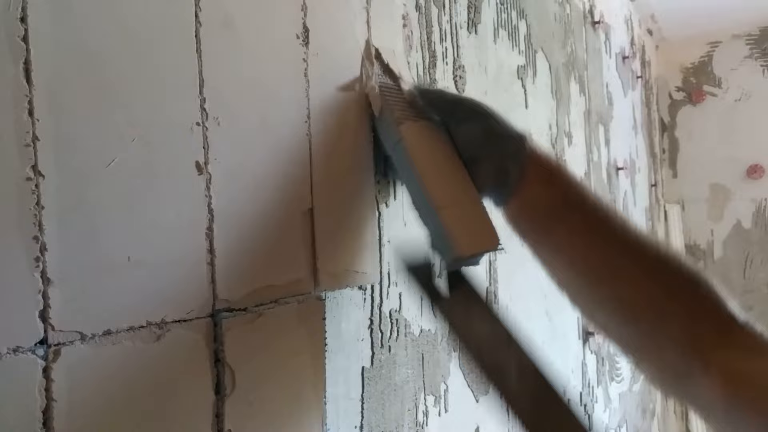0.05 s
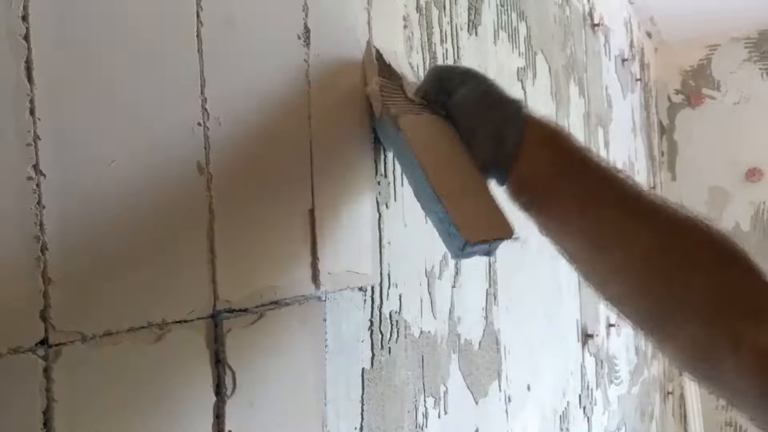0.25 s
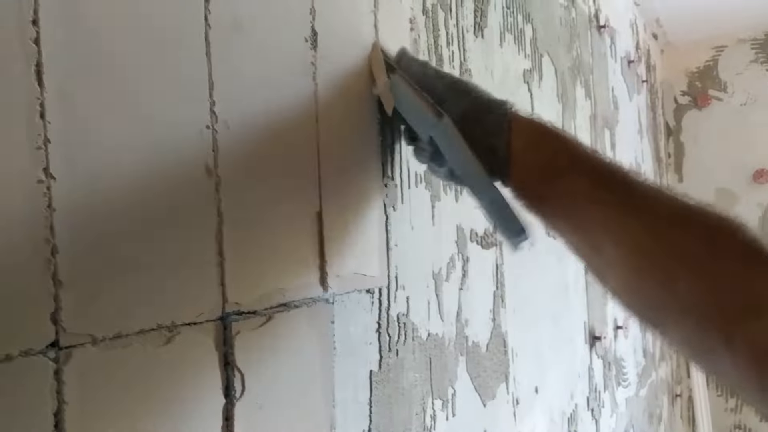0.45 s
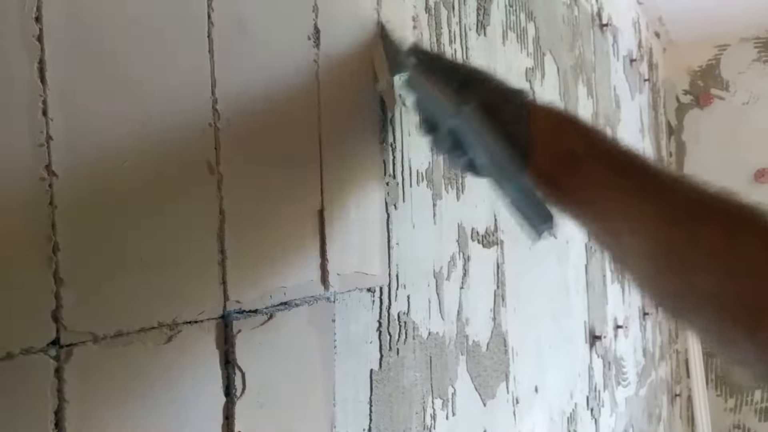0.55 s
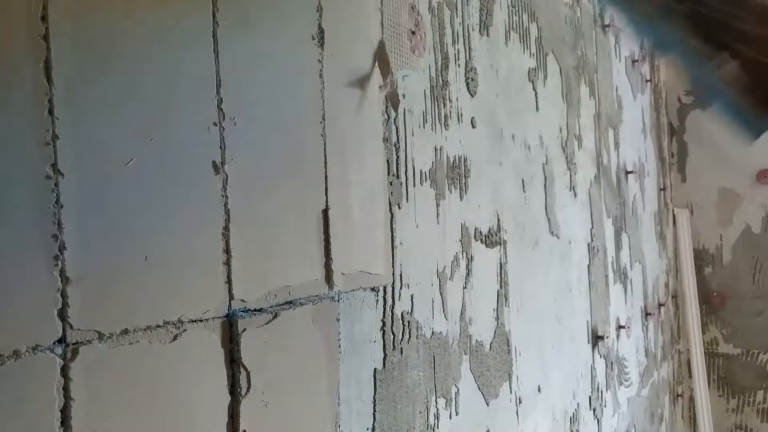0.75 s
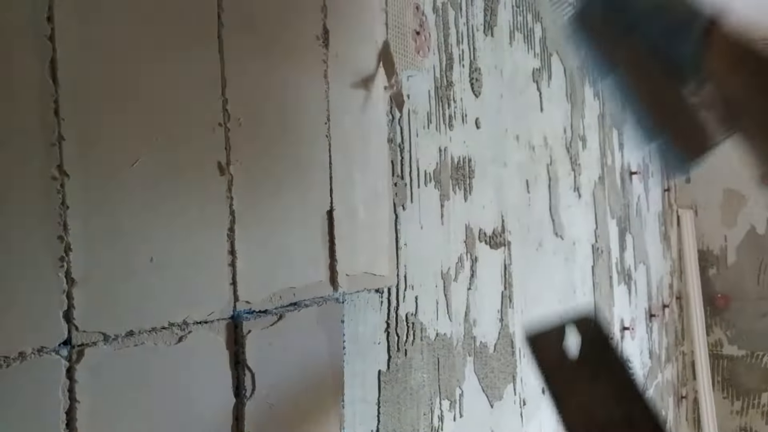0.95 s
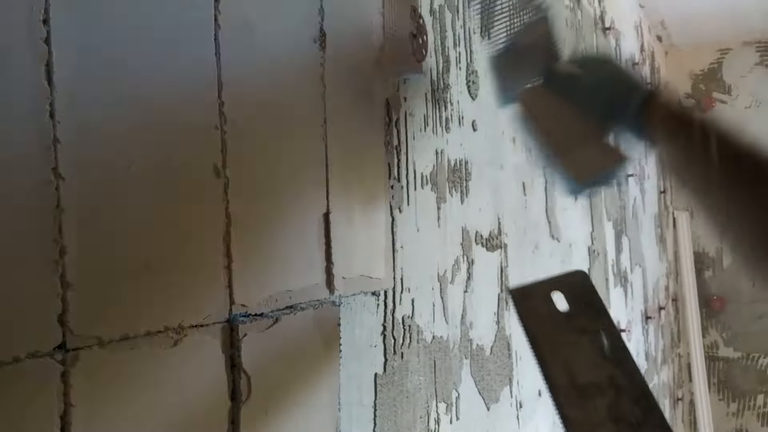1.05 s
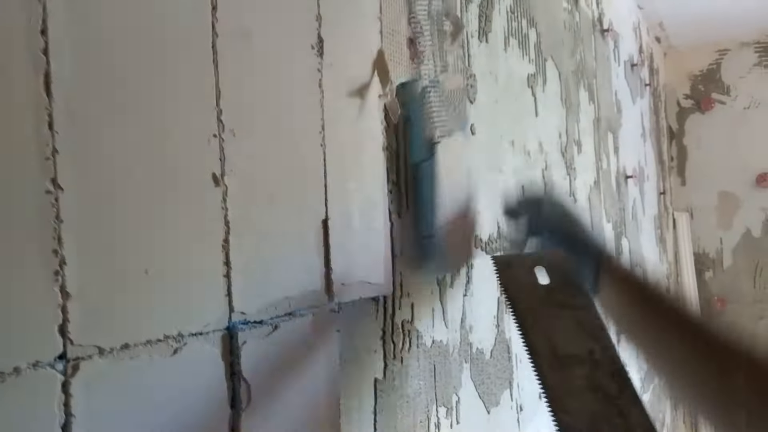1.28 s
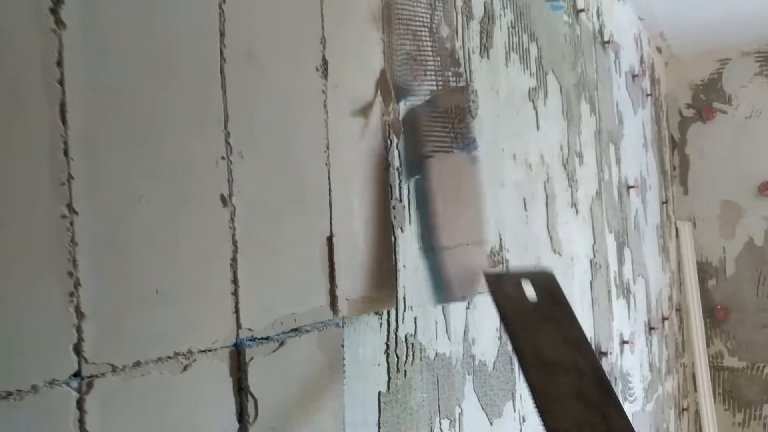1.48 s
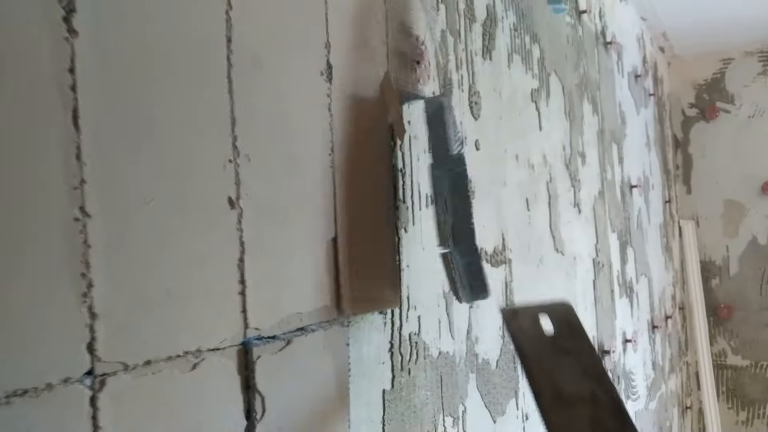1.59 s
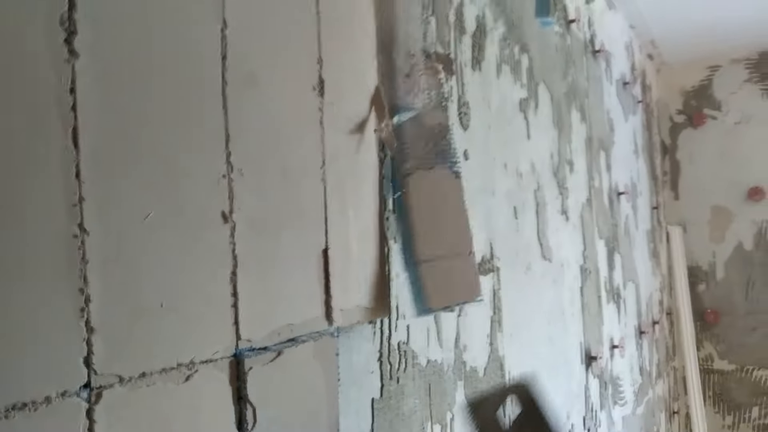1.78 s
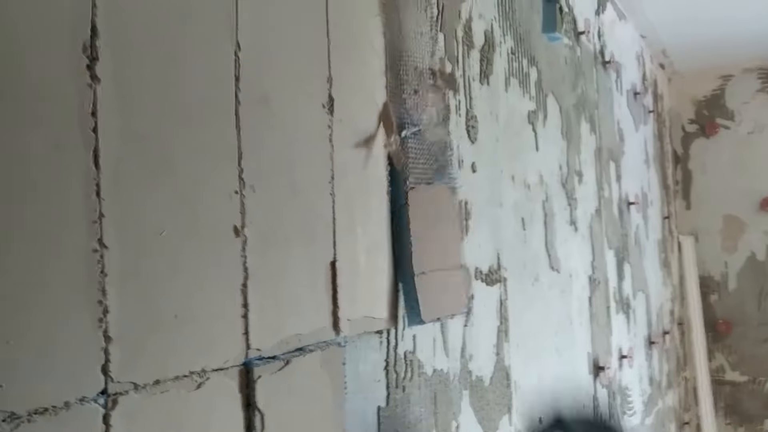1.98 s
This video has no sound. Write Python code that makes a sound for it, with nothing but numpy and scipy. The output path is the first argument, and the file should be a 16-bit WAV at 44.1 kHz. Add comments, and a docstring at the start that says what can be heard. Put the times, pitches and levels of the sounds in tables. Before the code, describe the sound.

Harsh tearing of a stiff foam panel from plaster, with brittle snaps, scraping and loose knocks

```python
"""A glued foam insulation board is torn off the wall of a bare room: bursts of tiny random clicks make the rip,
heard as bright crackle and as a duller rasp through the board, in two pulls. Glue snaps and board cracks are
short clicks and crumbs sent into resonances. Foam and mesh scrape the plaster as clicks in slipping surges; the
loose board knocks, ringing its own tones, and judders once. Steel tinks twice as fading pure tones. Noise makes
the hard echoes and a faint hush. The loudest moments are cut flat at a fixed limit."""
import sys
import numpy as np
from scipy import signal
from scipy.fft import rfft, irfft
from scipy.io import wavfile

SR = 44100
rng = np.random.default_rng(int(sys.argv[2]) if len(sys.argv) > 2 else 0)


def wav_out(sig):
    """Save sig, one row per channel (or a flat mono array), as 16-bit PCM at SR to the path in sys.argv[1]."""
    wavfile.write(sys.argv[1], SR, np.round(np.clip(np.atleast_2d(sig).T, -1, 1) * 32767).astype(np.int16))


N = 89567
T = np.arange(N) / SR  # time in seconds
SIZE = 2 ** 18  # Fourier length, with space for the echoes
HZ = np.maximum(np.arange(SIZE // 2 + 1) * SR / SIZE, 1)

# All levels below are relative, ahead of the layer gains, the room and the microphones.
# Background hush colour. Each row: frequency in Hz, level in dB.
HUSH_COLOUR = [(30, 4), (70, 15), (115, 33), (170, 7), (500, 31.5), (2000, 22.5), (15000, -90)]
HUSH_DB = -55
# How the microphones colour the sound. Each row: frequency in Hz, level in dB.
MICROPHONE = [(100, 3), (6900, -1.5), (7700, -2), (8200, -15.5), (9000, -7.5), (15000, -12.5)]
CLIP_LEVEL = 0.93  # largest signal size; full scale is 1
CUTOFF_HZ = 15600

# The bare room: time for echoes to fall 60 dB, first echo, and how fast the near wall's part fades.
ROOM_T60_S, ROOM_TREBLE_T60_S = 0.28, 0.21
FIRST_ECHO_S, NEAR_WALL_S = 0.0009, 0.0047
# Room sound at each pitch, added to a source's own room level. Each row: frequency in Hz, level in dB.
SCATTER = [(100, 4.5), (300, 3), (800, 4), (2000, 4.5), (3400, -4.5), (4300, 13.5), (12000, 10.5)]
# Left minus right for tearing, for rubbing and knocking, and for snaps and tinks.
# Each row: frequency in Hz, difference in dB.
TEAR_BALANCE = [(100, 3), (500, 3.5), (1200, 5), (2400, -0.5), (3500, 0.5), (4800, -5), (7000, -2),
                (9000, 3.5)]
RUB_BALANCE = [(100, -1), (500, -2), (1100, -2), (2400, -2), (3300, -3.5), (4300, -11), (7000, -10.5),
               (9000, 0.5)]
SNAP_BALANCE = [(2400, 2), (4300, -4), (6000, -1.5), (7200, -4), (9000, 5.5)]

# Touches on the steel. Each row: start in seconds, level in dB.
TINKS = [(1.033, -42), (1.2411, -15.5)]
# Tones of the steel. Each row: frequency in Hz, level in dB, time to fall 60 dB in seconds.
STEEL = [(5531, -5, .35), (5839, -8, .28), (6107, 0, .22), (7542, -4, .18)]

# Strokes of foam and mesh on the wall. Each row: time in seconds, crackle level in dB, body level in dB.
RUBS = [
    [(0.0, -66, -32), (0.04, -31, -49.5), (0.075, -26, -39.5), (0.136, -22, -48), (0.165, -42, -62),
     (0.2, -29.5, -38), (0.27, -37.5, -63)],
    [(1.0, -31.5, -41), (1.082, -29, -40.5), (1.216, -20.5, -32.5), (1.43, -37, -49.5)],
    [(1.44, -18.5, -38.5), (1.506, -24.5, -28.5), (1.555, -27.5, -42), (1.628, -20.5, -32.5),
     (1.714, -18.5, -29), (1.9, -22, -36), (1.975, -20.5, -30), (2.03, -17, -28)],
]
# Colours of the rubbing, direct and through the board. Each row: frequency in Hz, level in dB.
RUB_CRACKLE = [(2500, -15.5), (3500, -11.5), (4300, 4.5), (5500, 9.5), (7200, 6), (8000, 9), (10000, -1.5),
               (15000, -1)]
RUB_BODY = [(40, -57), (80, -8), (125, -10.5), (200, -1), (350, -5.5), (520, -4.5), (750, 8), (1100, -1),
            (1550, 9), (1900, 2.5), (2500, 4.5), (3300, 5), (5000, -27)]

# Blows of the loose board on the wall. Each row: start in seconds, level in dB, pitch in Hz, width in Hz,
# crumble fade time in seconds, broadband crack in dB against the ring.
KNOCKS = [(1.138, -41, 224, 220, 0.028, -5), (1.144, -34, 860, 900, 0.003, 12),
          (1.440, -36, 775, 800, 0.0022, -4), (1.444, -24.5, 1720, 1700, 0.0036, 9.5),
          (1.489, -42, 159, 80, 0.00085, -34), (1.489, -23.5, 2260, 2200, 0.013, -18),
          (1.568, -25.5, 685, 1210, 0.00072, 2), (1.5895, -19.5, 1020, 1380, 0.0017, -7.5),
          (1.682, -25, 1270, 910, 0.0037, -25), (1.712, -25.5, 1250, 1200, 0.0099, -15),
          (1.724, -26.5, 2050, 1100, 0.0058, -27), (1.915, -28, 980, 1290, 0.0064, 9),
          (1.950, -24.5, 1420, 1230, 0.0089, 0), (1.966, -18.5, 1240, 1910, 0.0029, 2)]
# Natural tones of the hanging board. Each row: frequency in Hz, level in dB.
BOARD_TONES = [(510, 7.5), (720, -4), (960, -5), (1340, 1.5), (1600, 2.5), (2020, -4)]
BOARD_WIDTH_HZ, CONTACT_DB = 88, -4
# One judder of the board's edge. It starts sharp by the sag, as a share of the settled pitch.
JUDDER_S, JUDDER_DB, JUDDER_HZ = 1.6925, 7, 928
JUDDER_SAG, JUDDER_DECAY_S = 0.11, 0.0035

# Brittle snaps of glue and mesh. Each row: start in seconds, level in dB, pitch in Hz, width in Hz,
# crumble fade time in seconds, broadband crack in dB against the ring.
SNAPS = [(0.001, -28, 6300, 2070, 0.0017, -6.5), (0.0745, -19, 7630, 1040, 0.0068, -25),
         (0.089, -24, 6150, 2100, 0.0071, -44), (0.101, -26, 5900, 1000, 0.001, -27),
         (0.126, -24, 7550, 2480, 0.0036, -7), (0.1498, -15.5, 6050, 1200, 0.00053, -40),
         (0.3615, -14, 6220, 2180, 0.031, 1), (0.483, -20.5, 4380, 900, 0.018, -25),
         (0.620, -28.5, 4750, 1800, 0.0045, -29), (0.652, -20, 4600, 2500, 0.0038, -15),
         (0.802, -18, 6800, 900, 0.0057, -15), (0.855, -20, 5700, 2500, 0.018, -16),
         (1.035, -30, 5340, 2000, 0.0051, -1), (1.116, -23, 5780, 2270, 0.035, -9),
         (1.200, -25, 7450, 1470, 0.0031, -28), (1.2405, -20.5, 6440, 1580, 0.0063, 0),
         (1.445, -20, 6060, 2260, 0.0017, -20), (1.489, -24.5, 4200, 2300, 0.0023, -24),
         (1.635, -28, 5550, 2000, 0.0036, -7), (1.829, -18.5, 6330, 1300, 0.011, -23),
         (1.907, -18, 7250, 600, 0.015, -29), (1.967, -26.5, 4500, 3000, 0.0091, -16),
         (1.994, -25.5, 6300, 2200, 0.0035, -4), (2.006, -20.5, 5550, 2500, 0.01, -22)]
# Cracks of the bending board. Each row: start in seconds, level in dB, pitch in Hz, width in Hz,
# crumble fade time in seconds, broadband crack in dB against the ring.
CRACKS = [(0.125, -38, 2130, 700, 0.003, -8), (0.28, -39.5, 2050, 1010, 0.0083, -20),
          (0.363, -22, 1220, 905, 0.012, -38), (0.442, -16.5, 2520, 500, 0.025, 5.5),
          (0.485, -22, 950, 920, 0.0075, 1), (0.652, -17.5, 1500, 300, 0.039, -5),
          (0.72, -24.5, 610, 300, 0.028, -31)]
CRUMBLE_DB, CRUMBLE_RISE_S = 9, 0.0011
CRACK_LOW_CUT_SHARE = 0.71  # low cut as a share of the blow's pitch

# The two pulls. Each row: time in seconds, crackle level in dB, body level in dB.
PULLS = [
    [(0.27, -62, -48), (0.28, -30.5, -34.5), (0.31, -27.5, -29), (0.35, -34, -40), (0.366, -27, -12.5),
     (0.422, -23, -26.5), (0.44, -13, -16), (0.482, -12.5, -20.5), (0.57, -96, -49), (0.58, -18, -29),
     (0.6, -65, -25)],
    [(0.6, -49, -54), (0.61, -30, -62), (0.62, -16.5, -22), (0.642, -26, -35.5), (0.658, -8.5, -12.5),
     (0.8, -6, -14.5), (0.848, -22, -20), (0.854, -16, -17), (0.954, -30, -36.5), (0.98, -64, -75),
     (1.0, -45, -50)],
]
# Colours of the tearing, direct and through the board. Each row: frequency in Hz, level in dB.
TEAR_CRACKLE = [(2800, -22.5), (3600, -3.5), (4300, 1.5), (5200, 4), (6900, 2), (7700, -2), (10000, -10),
                (15000, -10)]
TEAR_BODY = [(40, -32.5), (150, -13.5), (380, -10.5), (650, -6), (1000, -0.5), (1300, -9), (1600, 11.5),
             (1900, -7.5), (2500, 3), (3200, -4), (4500, -27)]
# Moving resonance of the bent board. Each row: time in seconds, frequency in Hz.
FLEX = [(0.37, 1540), (0.5, 1020), (0.66, 1400), (0.72, 1000), (0.76, 1630), (0.81, 1940), (0.95, 2360)]
FLEX_DB, FLEX_WIDTH_HZ = -7, 700  # the width of each of two passes


def from_db(db):
    """Turn decibels into a gain."""
    return 10 ** (np.asarray(db) / 20)


def rms_one(x):
    """Scale a sound to an average power of one."""
    return x / np.sqrt(np.mean(x ** 2) + 1e-20)


def at_hz(points):
    """Read a table at every frequency, in straight lines along log frequency."""
    hz, value = np.transpose(points)
    return np.interp(np.log(HZ), np.log(hz), value)


def colour(x, points):
    """Filter to a dB curve without any sound arriving early (minimum phase)."""
    cepstrum = irfft(np.log(from_db(at_hz(points))))
    # Folding the second half onto the first moves the whole response after time zero.
    cepstrum[1:SIZE // 2] *= 2
    cepstrum[SIZE // 2 + 1:] = 0
    response = np.exp(rfft(cepstrum))
    return irfft(rfft(x, SIZE) * response)[..., :N]


def high_pass(x, hz, order):
    """Remove the sound below a frequency."""
    return signal.sosfilt(signal.butter(order, hz, "high", fs=SR, output="sos"), x)


def resonator(hz, width):
    """Filter numbers for one resonance with a gain of about one at its peak; a wider one dies sooner."""
    r = np.exp(-np.pi * width / SR)
    top = np.array([1, 0, -1]) * (1 - r * r) / 2
    poles = [1, -2 * r * np.cos(2 * np.pi * hz / SR), r * r]
    return top, poles


def resonate(x, hz, width):
    """Ring one fixed resonance."""
    top, poles = resonator(hz, width)
    return signal.lfilter(top, poles, x + 1e-18)


def glide(x, hz, width):
    """Ring a resonance whose pitch moves, updated every 128 samples."""
    out, state = np.zeros(N), np.zeros(2)
    for i in range(0, N, 128):
        block = slice(i, i + 128)
        top, poles = resonator(hz[i], width)
        out[block], state = signal.lfilter(top, poles, x[block], zi=state)
    return out


def fractures(per_s, spread_db):
    """Foam cells or grit break as random clicks of uneven size and either sign."""
    size = from_db(spread_db * np.minimum(rng.exponential(1, N), 3.5))
    sign = rng.choice([-1, 1], N)
    breaks = rng.random(N) < per_s / SR
    return rms_one(size * sign * breaks)


def chips(per_s, spread_db, sharpness):
    """Larger flakes break at random, each ringing briefly at one of 24 pitches."""
    clicks = fractures(per_s, spread_db)
    dealt = rng.integers(0, 24, N)
    pitches = np.geomspace(450, 8000, 24)
    return rms_one(sum(resonate(clicks * (dealt == k), hz, hz / sharpness) for k, hz in enumerate(pitches)))


def slips(per_s, depth_db, relax_s):
    """Surfaces stick and slip: the gain surges suddenly at random, then dies back."""
    kicks = (rng.random(N) < per_s / SR) * rng.uniform(0.13, 1, N)
    keep = np.exp(-1 / (relax_s * SR))
    surge = signal.lfilter([1], [1, -keep], kicks + 1e-18)
    return rms_one(from_db(depth_db * np.tanh(surge)))


def stroke_gain(strokes, column):
    """Follow one level column over time; silent outside the strokes."""
    gain = np.zeros(N)
    for stroke in strokes:
        rows = np.array(stroke)
        active = (T >= rows[0, 0]) * (T < rows[-1, 0])
        gain += from_db(np.interp(T, rows[:, 0], rows[:, column])) * active
    return gain


def friction(strokes, crackle, body, grains, crackle_db, body_db):
    """The same breaking grains are heard directly as crackle and through the board as a rasp."""
    direct = from_db(crackle_db) * stroke_gain(strokes, 1) * rms_one(colour(grains, crackle))
    through_board = from_db(body_db) * stroke_gain(strokes, 2) * rms_one(colour(grains, body))
    return direct + through_board


def blows(rows, crumble_db=CRUMBLE_DB):
    """Each blow sends a click and a dying run of crumbs into a resonance, with a broader crack on top."""
    out = np.zeros(N + SR)
    t = T[:SR // 10]
    for s, db, hz, width, crumble_s, crack_db in rows:
        fade = np.exp(-t / crumble_s) * (1 - np.exp(-t / CRUMBLE_RISE_S))
        crumbs = rng.standard_normal(len(t)) * (rng.random(len(t)) < 3000 / SR) * fade
        force = from_db(crumble_db) * rms_one(crumbs) / np.sqrt(len(t))
        force[0] = 1  # the first click
        ring = resonate(resonate(force, hz, width), hz, hz / 2)
        crack = high_pass(resonate(force, hz, hz * 2), hz * CRACK_LOW_CUT_SHARE, 1)
        sound = rms_one(ring) + from_db(crack_db) * rms_one(crack)
        start = max(int(s * SR), 0)
        # The row's level sets the power over this tenth of a second.
        out[start:start + len(t)] += from_db(db) * rms_one(sound)
    return out[:N]


def bare_room(near_wall_db):
    """Hard walls give dense fading echoes; the rough near wall adds early treble, and treble dies first."""
    noise = rng.standard_normal((2, N))
    scattered = noise * (1 + from_db(near_wall_db) * np.exp(-T / NEAR_WALL_S))
    low = signal.sosfilt(signal.butter(2, 2500, fs=SR, output="sos"), noise)
    high = high_pass(scattered, 2500, 2)
    low_tail = low * from_db(-60 * T / ROOM_T60_S)
    high_tail = high * from_db(-60 * T / ROOM_TREBLE_T60_S)
    # Subtracting keeps the two bands in step where they meet.
    tail = (low_tail - high_tail) * (T > FIRST_ECHO_S)
    return rms_one(tail) / np.sqrt(N)


def place(x, room, balance, wet_db, lag_s):
    """Direct sound reaches the left microphone first, the right one a lag later; room echoes are added."""
    direct = np.array([np.ones(len(HZ)), np.exp(-2j * np.pi * HZ * lag_s)])
    wet = from_db(wet_db + at_hz(SCATTER))
    path = (direct + wet * rfft(room, SIZE)) / np.sqrt(1 + wet ** 2)
    sides = from_db(at_hz(balance) * np.array([[0.5], [-0.5]]))
    return irfft(rfft(x, SIZE) * path * sides)[:, :N]


def background_hush():
    """Faint coloured noise, separate in each channel."""
    return from_db(HUSH_DB) * rms_one(colour(rng.standard_normal((2, N)), HUSH_COLOUR))


def tinks():
    """Light touches set steel ringing in pure tones, each fading at its own rate."""
    out = np.zeros(N)
    for s, db in TINKS:
        age = np.maximum(T - s, 0)
        for hz, tone_db, t60 in STEEL:
            out += from_db(db + tone_db - 60 * age / t60) * np.sin(2 * np.pi * hz * age)
    return out


def rubbing():
    """Foam and mesh drag over gritty plaster, breaking grains in stick-slip surges."""
    grit = fractures(per_s=3000, spread_db=-2) * slips(per_s=23, depth_db=18.0, relax_s=0.0044)
    grains = rms_one(grit + from_db(-4.5) * chips(per_s=1100, spread_db=5.5, sharpness=25.5))
    return friction(RUBS, RUB_CRACKLE, RUB_BODY, grains, crackle_db=0, body_db=6.0)


def judder():
    """The board's edge catches on the plaster in a short hollow tone that sags in pitch."""
    age = np.maximum(T - JUDDER_S, 0)
    decay = np.exp(-age / JUDDER_DECAY_S)
    hz = JUDDER_HZ * (1 + JUDDER_SAG * decay)
    swell = (1 - np.exp(-age / CRUMBLE_RISE_S)) * decay
    phase = 2 * np.pi * np.cumsum(hz * (age > 0)) / SR
    return from_db(JUDDER_DB) * swell * np.sin(phase)


def knocking():
    """Each knock on the plaster briefly rings the hanging board's tones; its edge also judders once."""
    contact = blows(KNOCKS, crumble_db=-2.5)
    board = sum(from_db(db) * resonate(contact, hz, BOARD_WIDTH_HZ) for hz, db in BOARD_TONES)
    return from_db(CONTACT_DB) * contact + board + judder()


def glue_snaps():
    """Brittle glue and mesh let go in high, short snaps."""
    return blows(SNAPS)


def board_cracks():
    """The board cracks as it bends, in lower resonances."""
    return blows(CRACKS)


def tearing():
    """Foam rips in dense surges, shedding flakes; the bent board's resonance shifts as it comes free."""
    cells = fractures(per_s=3500, spread_db=0.5) * slips(per_s=160, depth_db=11.5, relax_s=0.0039)
    grains = rms_one(cells + from_db(-3) * chips(per_s=800, spread_db=6, sharpness=12.2))
    centre = np.interp(T, *np.transpose(FLEX))
    bent_board = glide(glide(grains, centre, FLEX_WIDTH_HZ), centre, FLEX_WIDTH_HZ)
    flex = from_db(FLEX_DB) * stroke_gain(PULLS, 2) * rms_one(bent_board)
    return friction(PULLS, TEAR_CRACKLE, TEAR_BODY, grains, crackle_db=2.5, body_db=0) + flex


def scene():
    """Place the sources in the room, each with its own echoes and lag, over the hush."""
    steel = place(tinks(), bare_room(near_wall_db=16), SNAP_BALANCE, wet_db=0, lag_s=0.000515)
    rubs = place(rubbing(), bare_room(near_wall_db=11.5), RUB_BALANCE, wet_db=-3, lag_s=0.00043)
    knocks = place(knocking(), bare_room(near_wall_db=12.5), RUB_BALANCE, wet_db=1.5, lag_s=0.00038)
    snaps = place(glue_snaps(), bare_room(near_wall_db=7.5), SNAP_BALANCE, wet_db=-11, lag_s=0.000472)
    torn_board = tearing() + board_cracks()
    tear = place(torn_board, bare_room(near_wall_db=9.0), TEAR_BALANCE, wet_db=-1, lag_s=0.000427)
    return background_hush() + steel + rubs + knocks + snaps + tear


def record(dry):
    """The microphones colour the sound, which is then cut flat at a limit; a steep filter then cuts the top."""
    clipped = np.clip(colour(dry, MICROPHONE), -CLIP_LEVEL, CLIP_LEVEL)
    top_cut = signal.ellip(10, 0.1, 70, CUTOFF_HZ, fs=SR, output="sos")
    return signal.sosfilt(top_cut, clipped)


dry = scene()
out = record(dry)
wav_out(out)
```